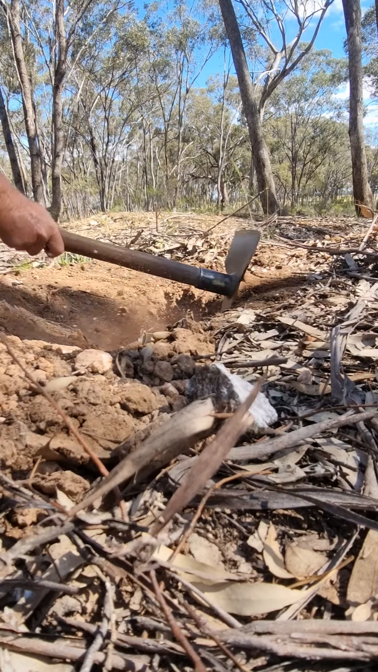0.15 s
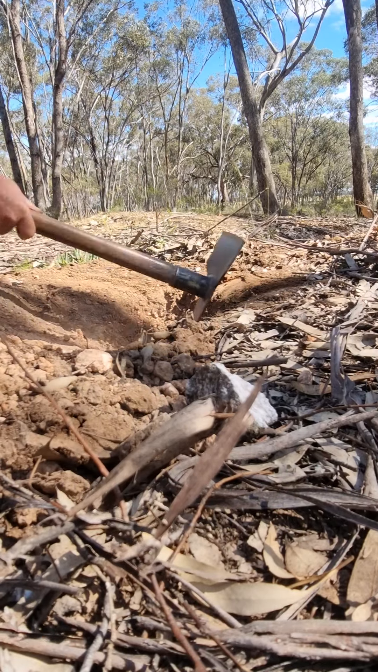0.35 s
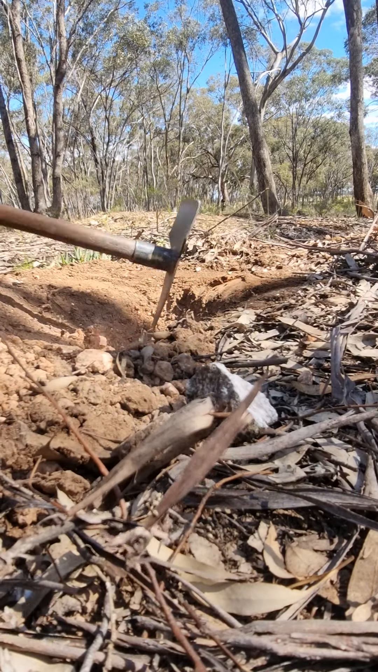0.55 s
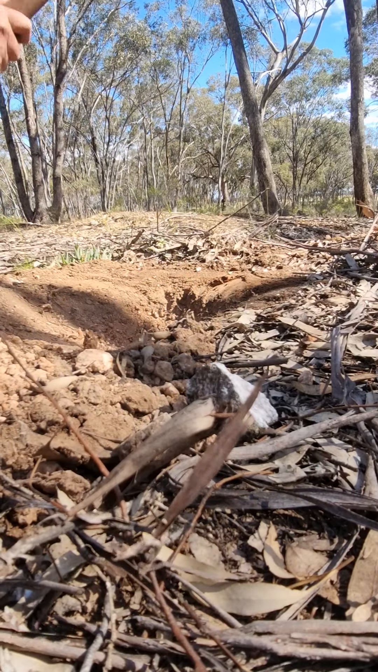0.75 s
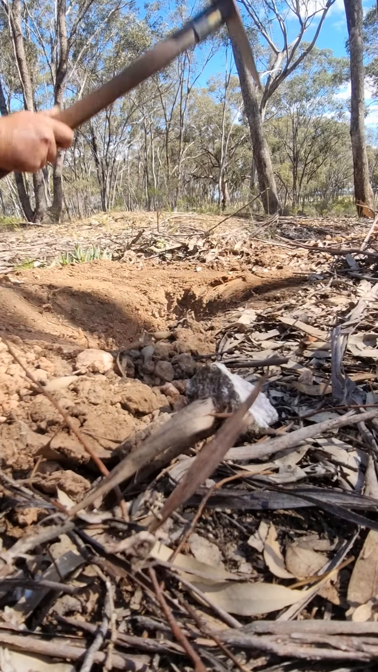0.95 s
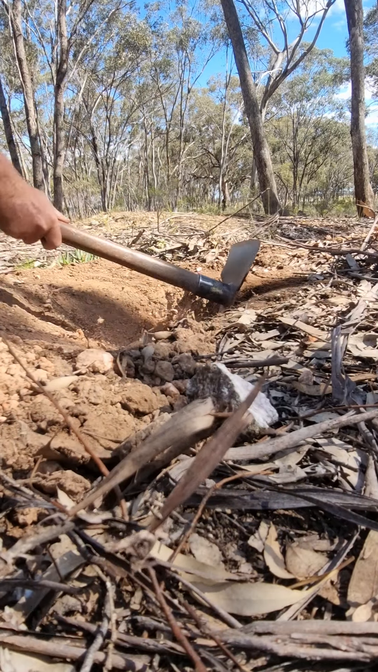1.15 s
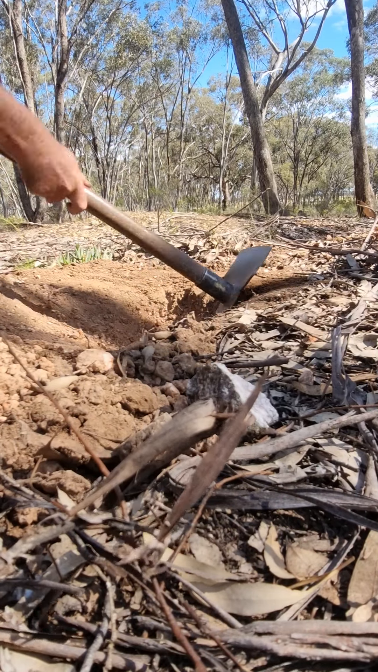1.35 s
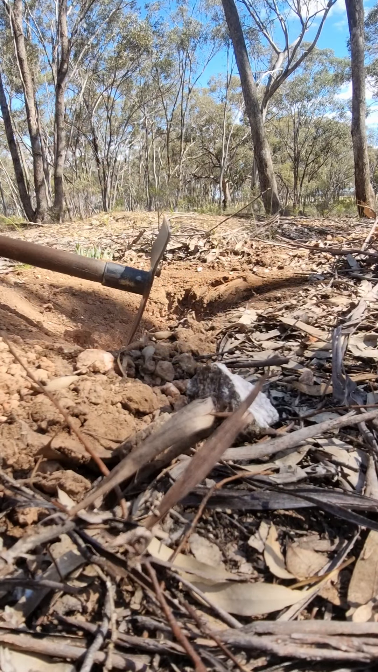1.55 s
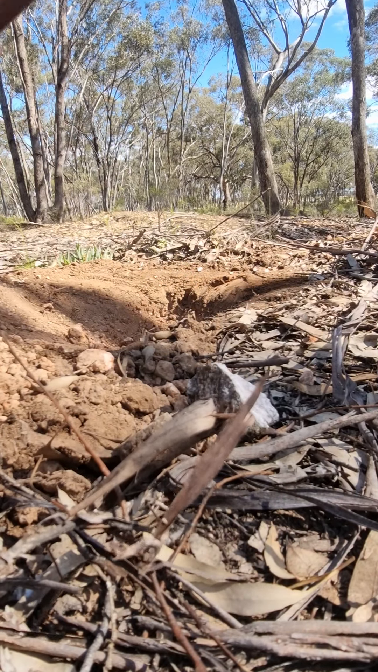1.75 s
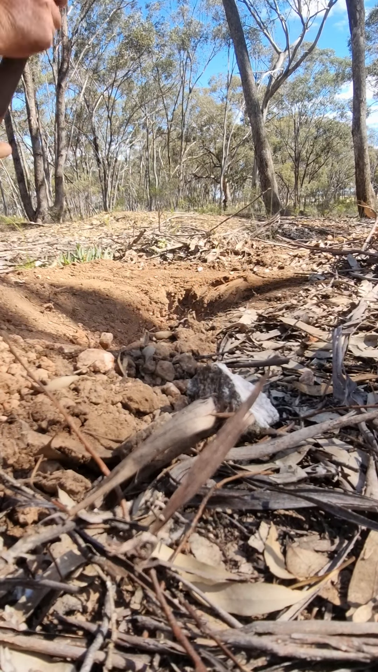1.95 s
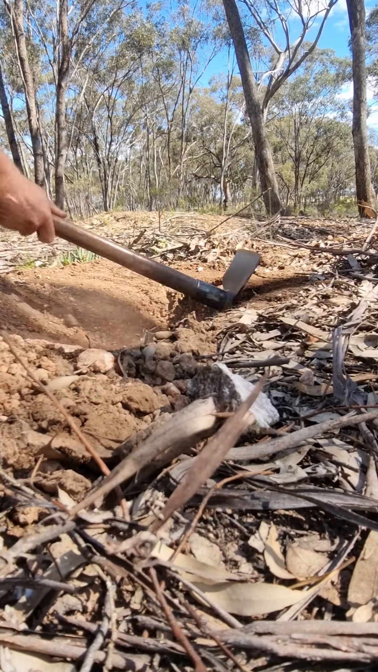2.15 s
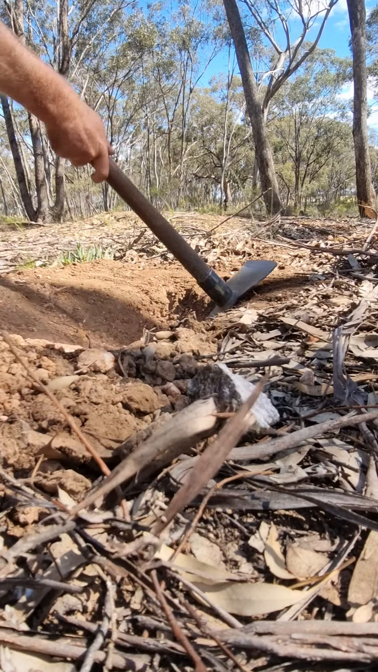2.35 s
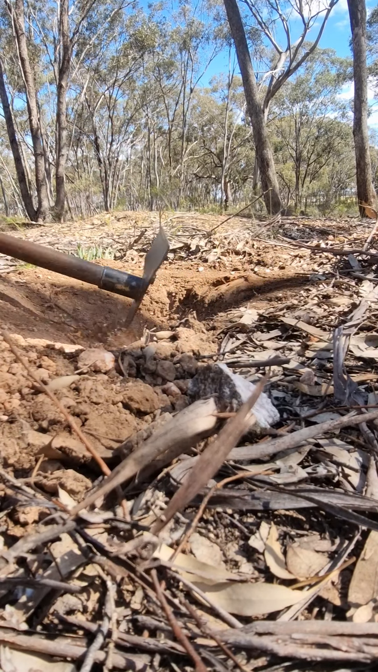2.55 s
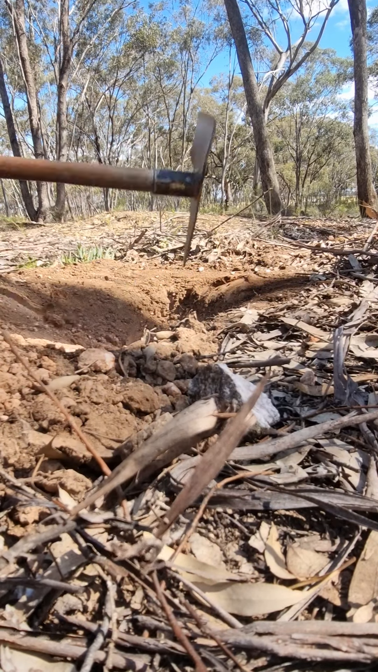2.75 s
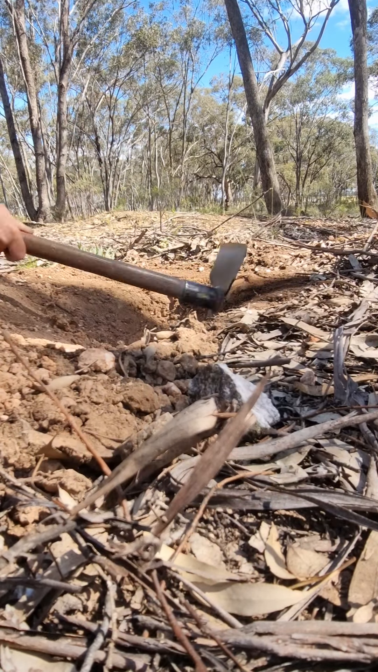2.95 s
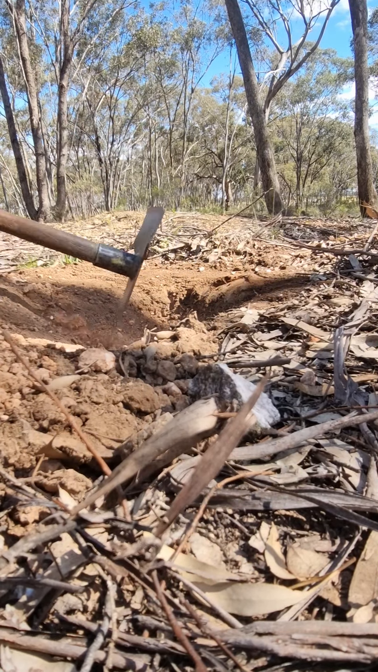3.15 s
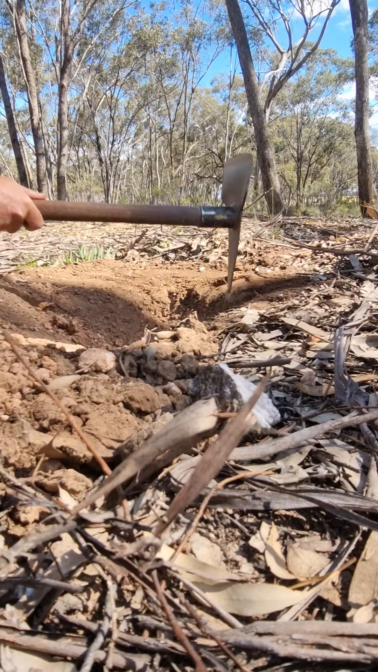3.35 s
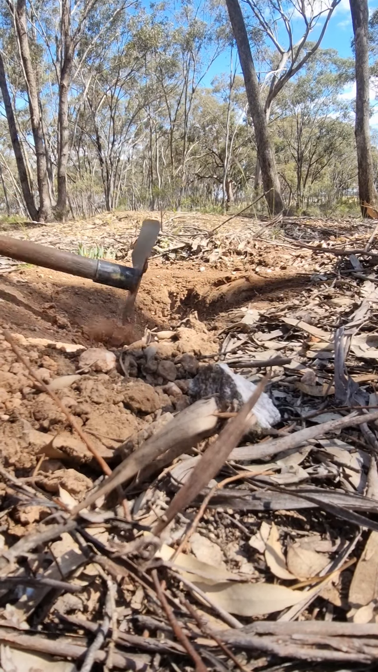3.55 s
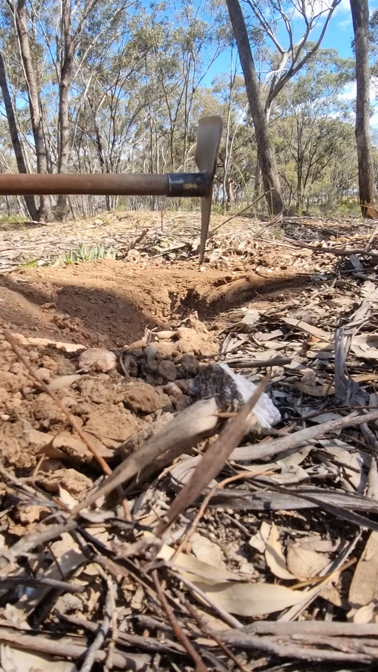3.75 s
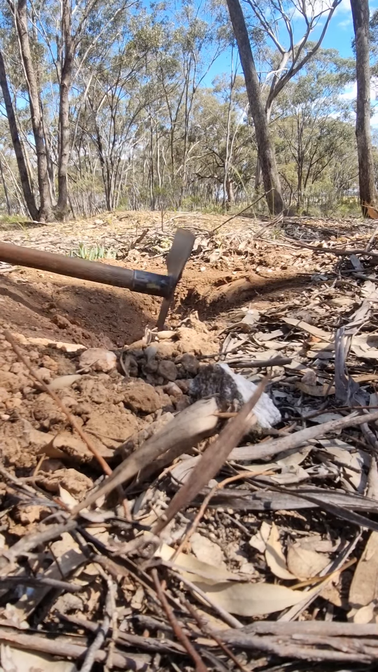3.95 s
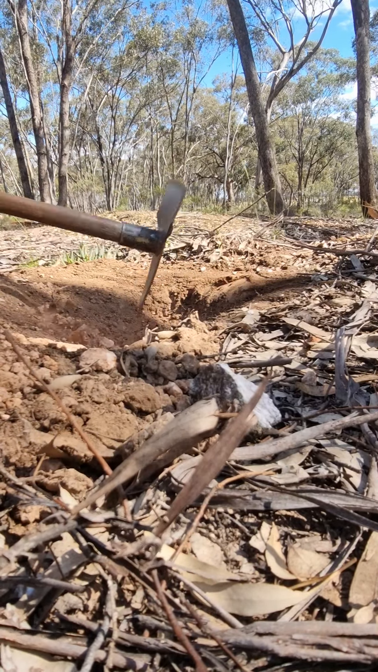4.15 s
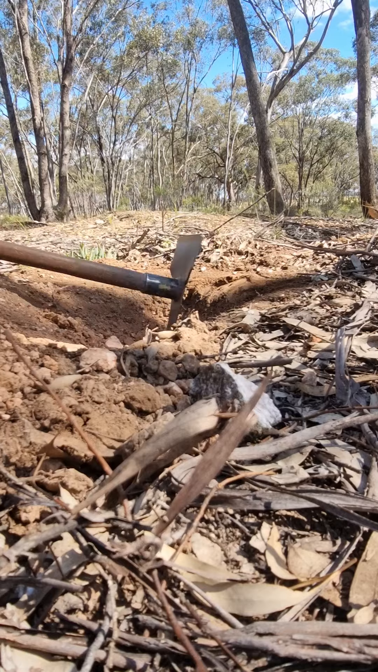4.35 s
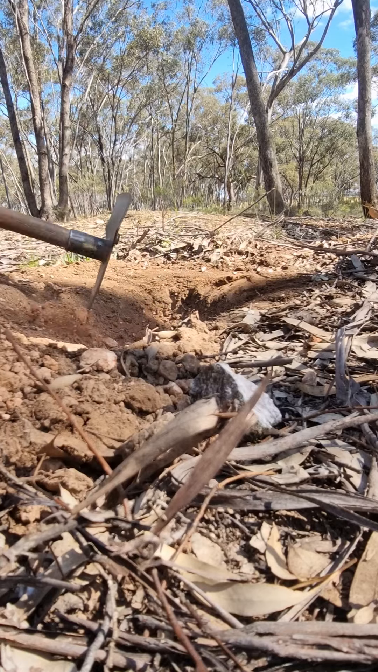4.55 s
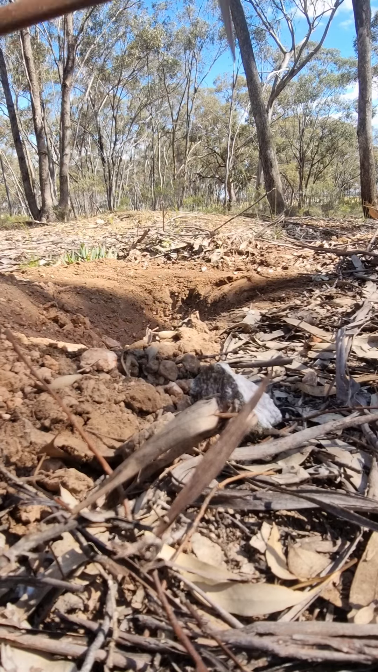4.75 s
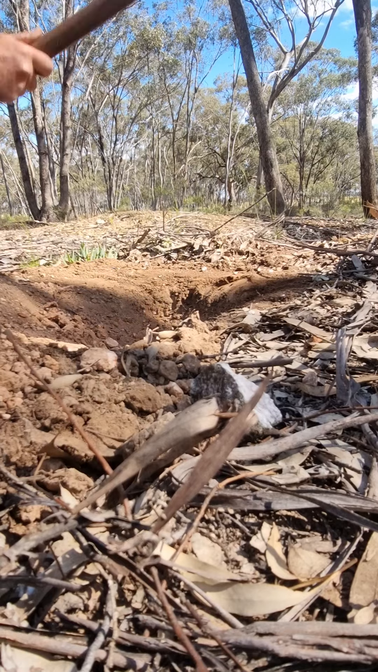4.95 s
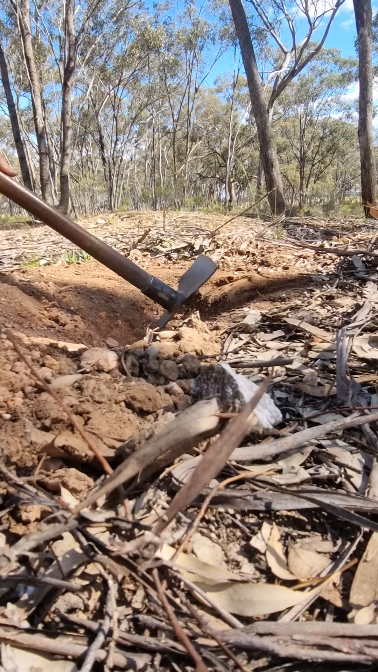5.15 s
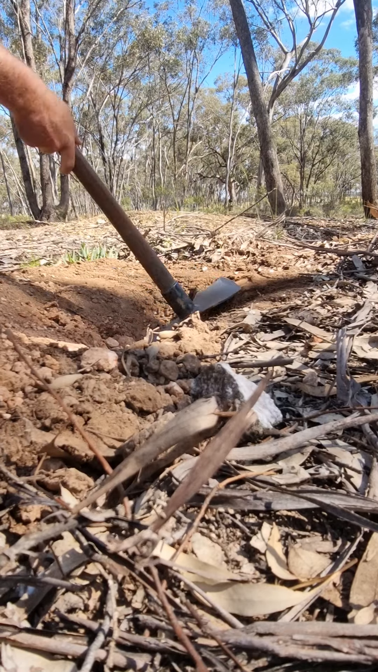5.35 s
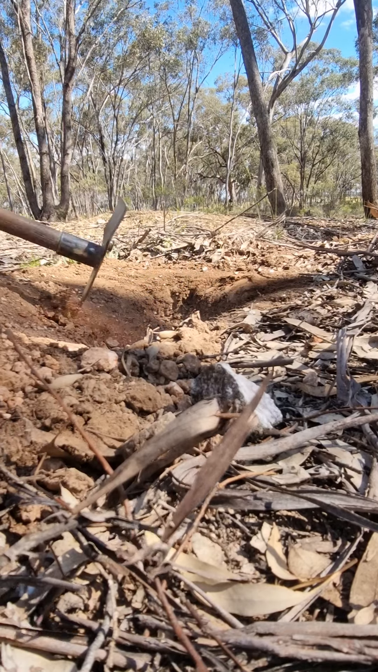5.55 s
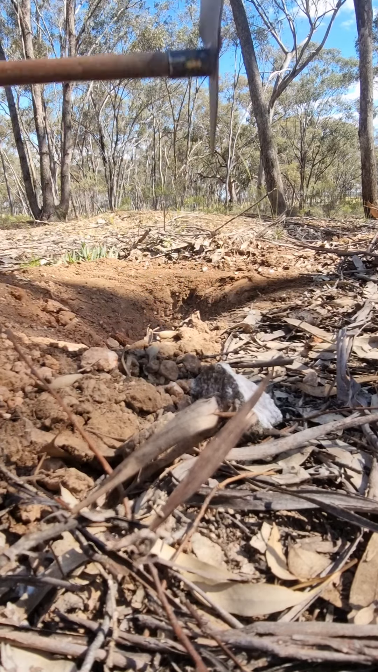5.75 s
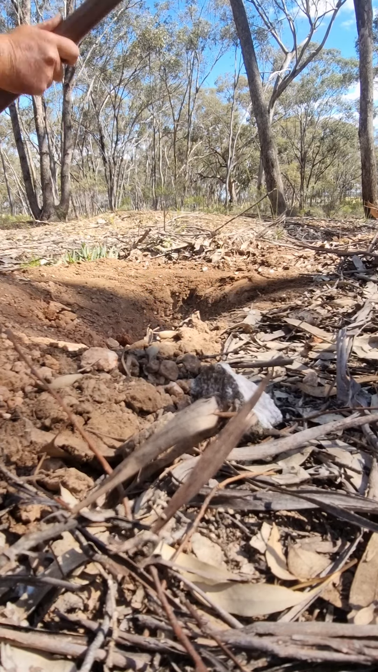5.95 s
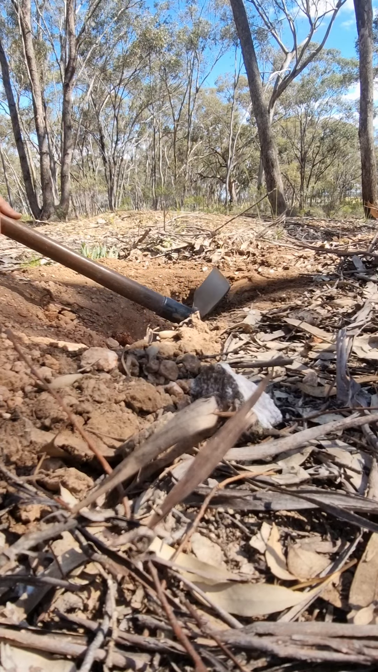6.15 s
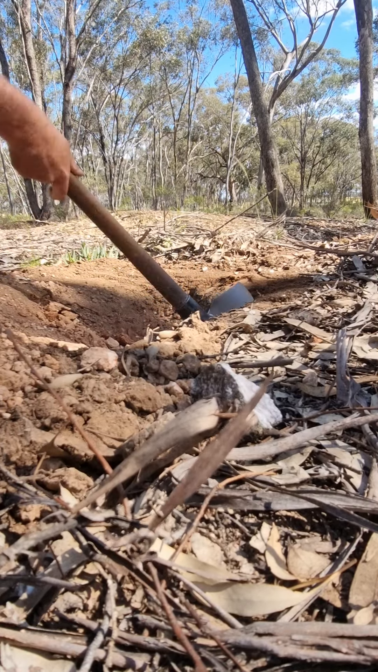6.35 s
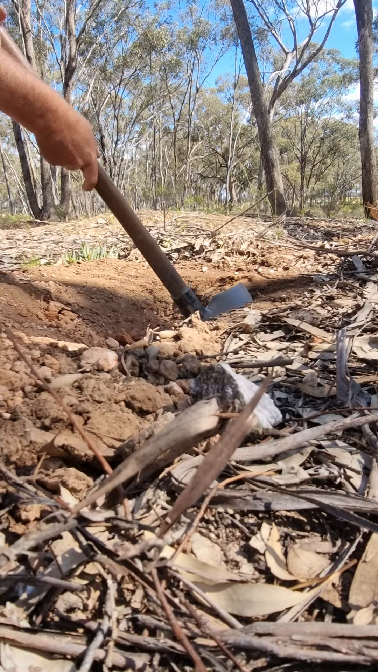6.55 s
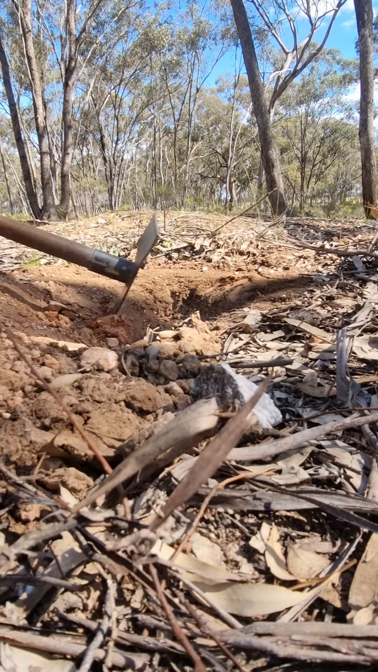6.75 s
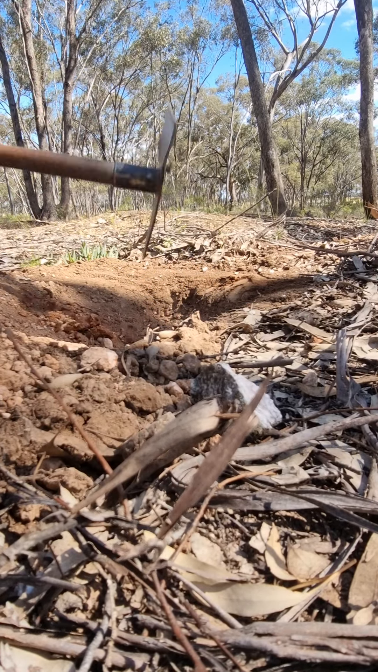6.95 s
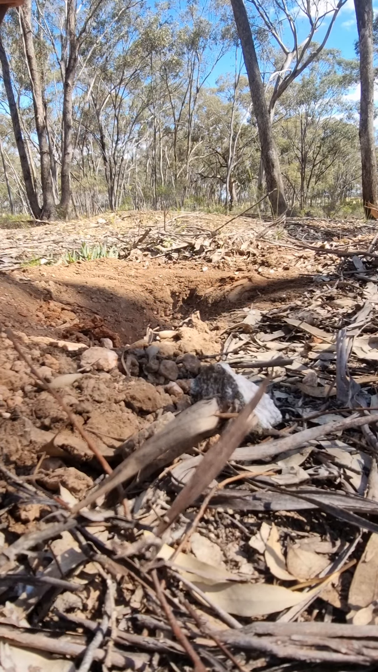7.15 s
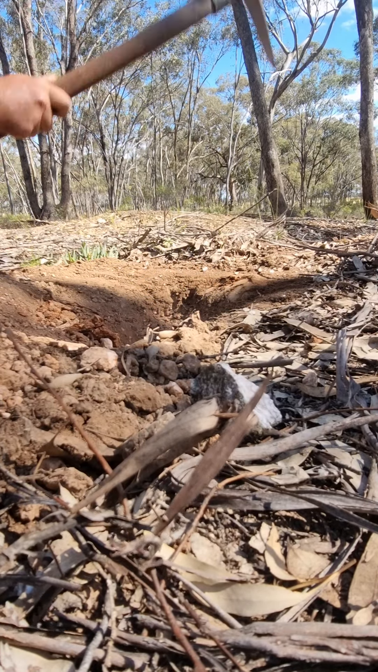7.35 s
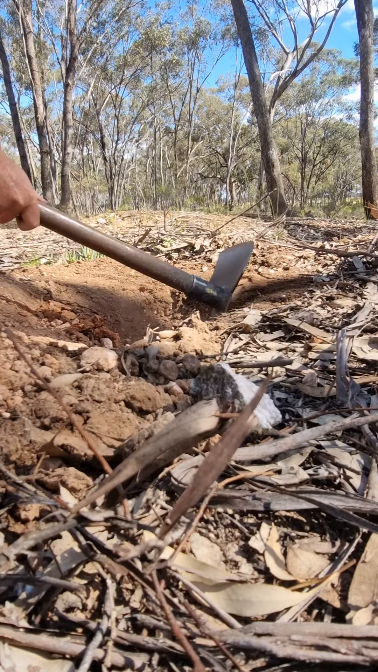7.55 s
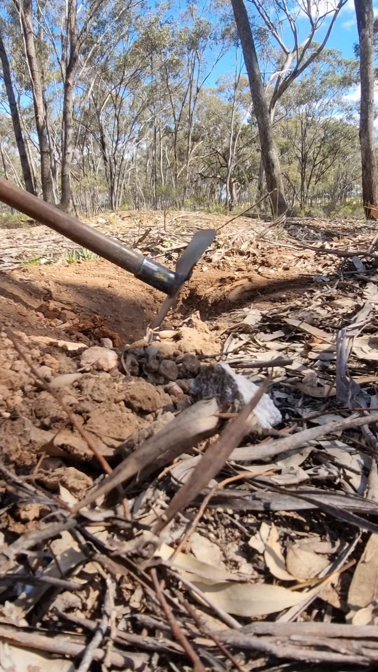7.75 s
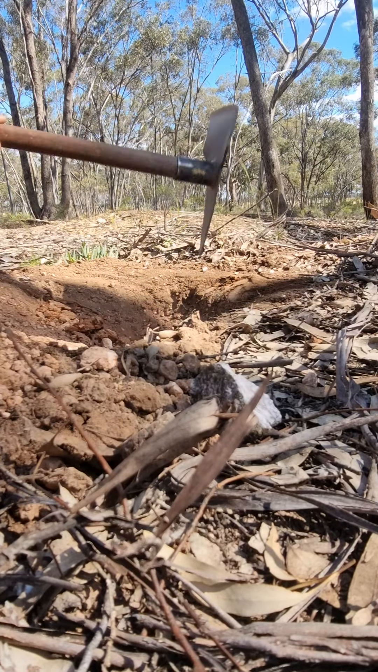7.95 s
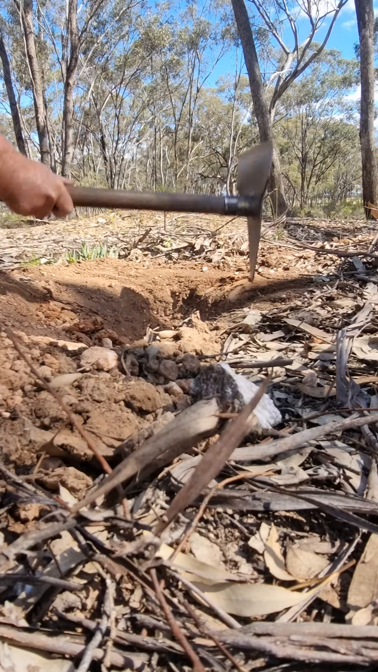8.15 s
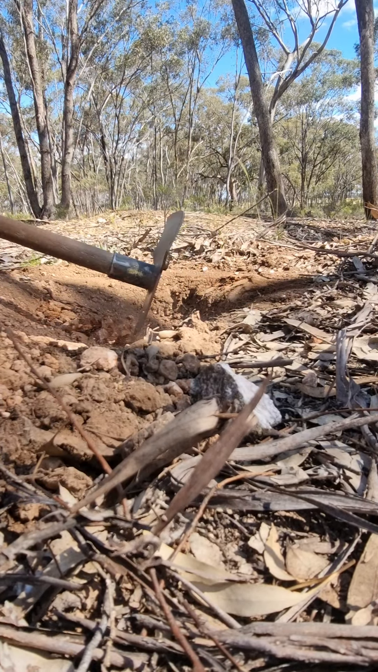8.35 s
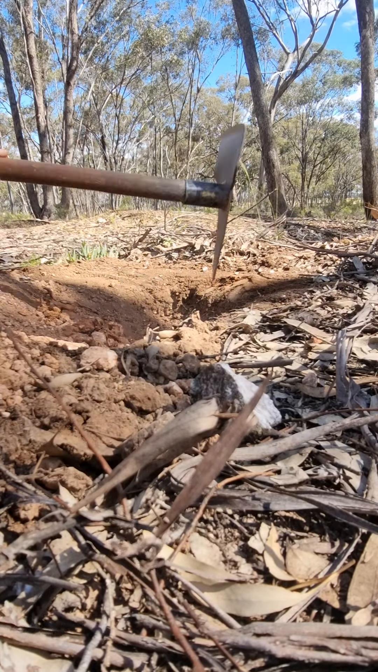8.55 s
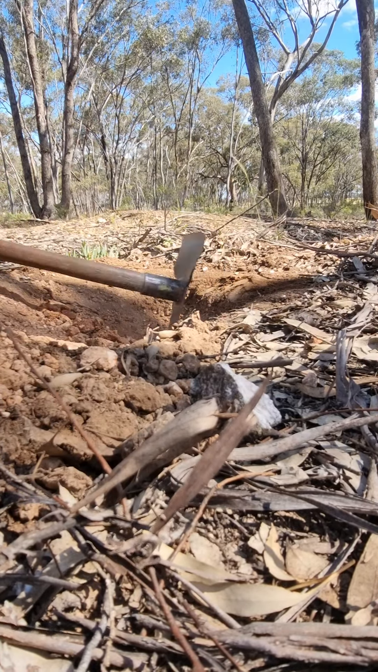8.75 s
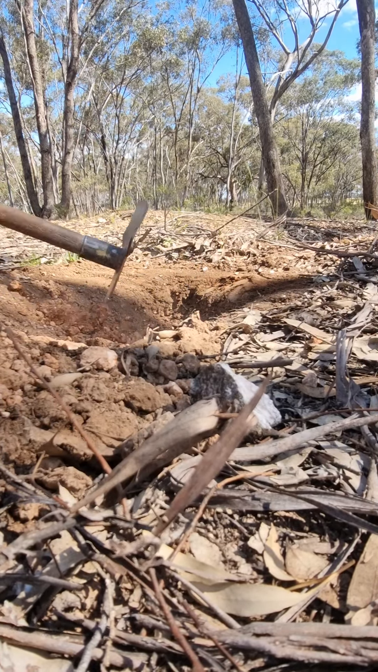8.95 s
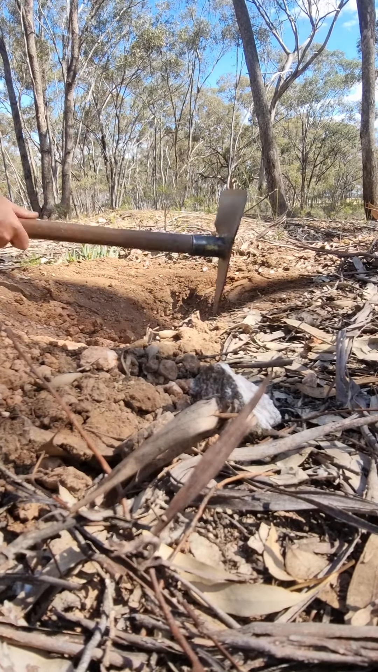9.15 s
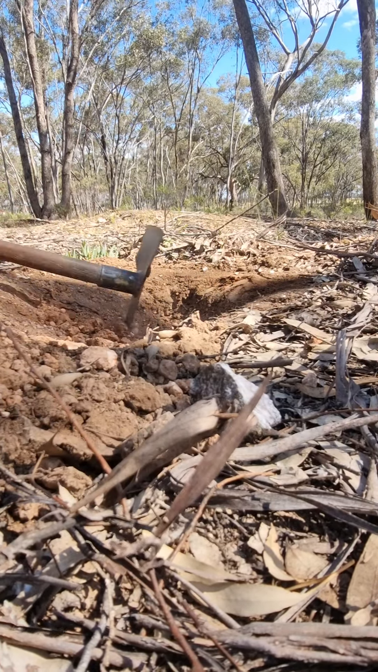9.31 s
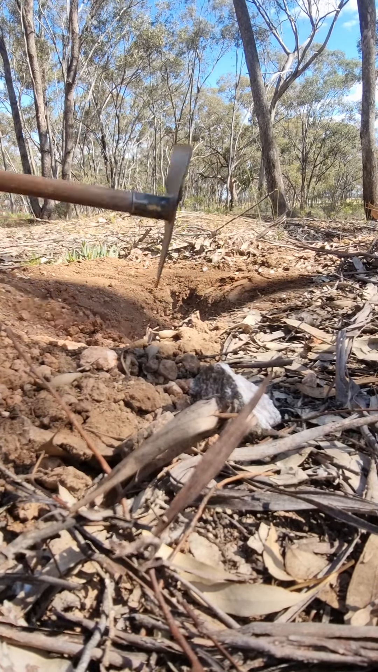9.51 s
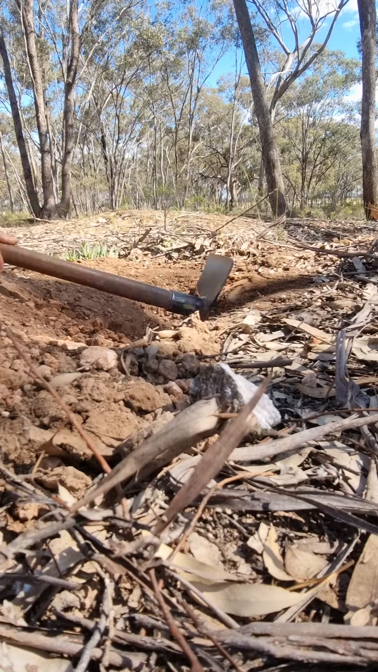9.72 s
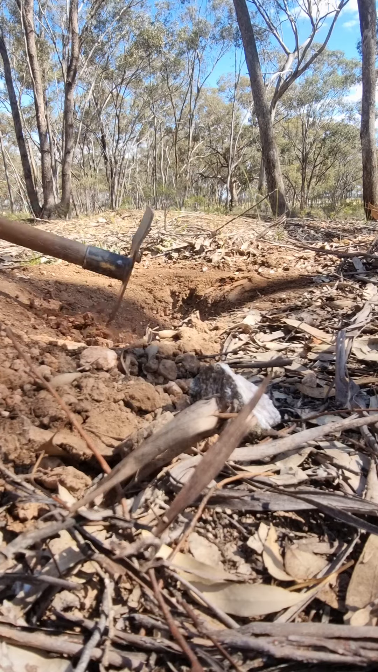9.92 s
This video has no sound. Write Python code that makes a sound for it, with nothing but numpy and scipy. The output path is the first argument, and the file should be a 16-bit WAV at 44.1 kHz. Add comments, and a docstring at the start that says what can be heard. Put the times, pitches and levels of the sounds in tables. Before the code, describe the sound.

A small pick chops and scrapes repeatedly into dry, stony ground, with grit pattering on leaves and a low wind rumble.

```python
"""A small pick chops again and again into dry, stony ground, close by in open bush. Each blow crunches through
grit, clanks on stone, thuds the earth, rings the steel head and throws up a spray of soil. Between blows the
point drags back, catching on stones that twang the wooden handle. Clods and grit patter on dry leaves and loose
soil slides into the hole. Behind it all a breeze rumbles on the microphone and rustles the trees."""
import sys
import numpy as np
from scipy import signal
from scipy.fft import rfft, irfft, next_fast_len
from scipy.io import wavfile

SR = 44100
rng = np.random.default_rng(int(sys.argv[2]) if len(sys.argv) > 2 else 0)


def waveform_to_disk(signal):
    """Save audio, clipped to [-1, 1], as 16-bit WAV at the path in sys.argv[1]."""
    frames = np.transpose(np.atleast_2d(signal))
    scaled = np.clip(frames, -1, 1) * 32767
    samples = np.round(scaled).astype(np.int16)
    wavfile.write(sys.argv[1], SR, samples)


N = 440118
TIME = np.arange(N) / SR
CATCH_S = 0.0078  # how long a stone holds the point
SPRAY_DB = -31  # thrown soil, relative to the bite of the blow

# The blows of the pick. Each row: start in seconds, crunch in dB, sinking time in seconds, treble
# over bass in dB, earth thud in dB, low and high steel ring in dB, clank in Hz, handle jolt in dB.
BLOWS = [(.151, -10, 0.0218, 4, -19, -36, -30.5, 6740, -44),
         (1.117, -12.5, 0.0145, 1, -7.5, -41, -36.5, 3050, -54),
         (2.175, -6.5, 0.0161, 0.5, -19, -36, -45, 1587, -52),
         (3.052, -14.5, 0.018, 4.5, -15.5, -31.5, -40, 4010, -42),
         (3.516, -16, 0.0125, 1, -15, -34.5, -44, 6970, -21),
         (3.975, -21.5, 0.017, 1.5, -23.5, -49, -45, 6640, -23),
         (4.413, -30, 0.021, 16.5, -23.5, -51, -61, 6680, -28),
         (5.14, -15, 0.0152, -4, -11.5, -43, -60, 1600, -14.5),
         (6.175, -19.5, 0.0192, 0, -17, -35.5, -54, 4150, -27.5),
         (7.517, -13, 0.017, 4.5, -9.5, -26.5, -37.5, 7080, -20.5),
         (8.273, -20.5, 0.038, 22, -16, -30, -40, 3380, -24.5),
         (8.802, -21.5, 0.0204, 2.5, -17.5, -47, -44, 7230, -23.5),
         (9.816, -6, 0.0091, -5.5, -26, -58, -38, 637, -22)]
# The point dragged through grit. Each row: start in seconds, length in seconds, level in dB.
DRAGS = [(0.362, 0.18, -37), (1.327, 0.047, -36.5), (1.471, 0.13, -35.5), (2.47, 0.32, -35),
         (3.083, 0.13, -35), (3.499, .19, -35.5), (3.956, 0.23, -33.5), (4.429, .16, -32.5),
         (5.498, .17, -36.5), (6.403, 0.14, -43.5), (6.6, 0.28, -35), (7.74, .06, -42), (7.847, 0.055, -34),
         (8.3, .17, -38), (8.788, 0.21, -32.5), (9.264, 0.18, -28), (9.845, .17, -32)]
# Clods landing. Each row: start in seconds, level in dB, pitch in Hz, left over right in dB.
CLODS = [(2.338, -27.5, 3340, 8), (2.693, -24, 2050, -3), (2.725, -24.5, 2200, -24),
         (2.748, -13.5, 1010, -12.5), (2.757, -23.5, 1690, 34), (2.839, -35.5, 3600, -16),
         (2.902, -37.5, 3400, -15), (4.224, -40.5, 780, 0), (9.107, -24.5, 2240, -15),
         (9.799, -25.5, 3770, -25.5)]
# Resonances heard while the point is buried: the pick's modes, plus the microphone's 15 kHz peak.
# Each row: frequency in Hz, width in Hz, lift when struck in dB, lift when dragged in dB.
RESONANCES = [(371, 37, 5.5, 13), (549, 24, 4, 5.5), (702, 96, 1.5, 7), (1104, 220, 4, 16.5),
              (1585, 52, 4, 17), (1627, 47, 10.5, 20.5), (1908, 96, 6, 15), (2510, 170, 7.5, 17.5),
              (2870, 110, 2.5, 2), (3156, 120, 6, 12), (3870, 88, -4.5, 13), (4130, 260, 9, 18.5),
              (5166, 146, 12, 10), (5635, 39, 2, 12.5), (6260, 50, 4, -3), (6330, 82, 16.5, -10),
              (7090, 990, 9, 15), (7500, 240, -14, 5), (9800, 30, 16.5, 5), (10230, 190, 13, 18),
              (10950, 240, 6, 20), (13070, 1000, 5, 16.5), (15060, 570, 18.5, 13)]
# Modes of the head ringing free. Each row: frequency in Hz, t60 in seconds, scraped level in dB.
STEEL_MODES = [(4168, 0.37, -25.5), (5583, 0.29, -45), (625.6, 0.15, -23.5), (1101, 0.058, -17.5),
               (1700, 0.11, -13), (2610, 0.099, -23.5), (4064, 0.069, -16), (5900, 0.048, -24),
               (9490, 0.12, -39)]


def crunch(split_hz=1800, crush_share=0.39, bass_stretch=1.57):
    """The point shatters grit; the crack is bright at first and dulls as the steel sinks in."""
    # Shattering grit. Each row: frequency in Hz, level in dB.
    crunch_spectrum = [(40, -25), (150, -0.5), (400, -5), (850, -7.5), (2200, -13.5), (3900, -15),
                       (4700, -20), (7400, -22.5), (8400, -33.5), (9600, -25.5), (13500, -26.5),
                       (16000, -43)]
    bass, treble = np.zeros((2, N))
    lead_in = np.linspace(0, 1, SR // 200) ** 2  # a faint 5 ms swell of grit noise into each crunch
    for start, db, sink_s, bright_db, *_ in BLOWS:
        crush_s = crush_share * sink_s
        add(treble, start - len(lead_in) / SR, amp(db - 14.5) * lead_in)
        add(treble, start, amp(db - 2 + bright_db / 2) * burst(crush_s, rise=0.0008))
        add(bass, start, amp(db - bright_db / 2) * burst(crush_s * bass_stretch, rise=0.0014))
    cracks = grains(per_s=9000, spread_db=4)
    dull = signal.sosfilt(signal.butter(2, split_hz, fs=SR, output="sos"), cracks * bass)
    sharp = signal.sosfilt(signal.butter(2, split_hz, "high", fs=SR, output="sos"), cracks * treble)
    peaks = [(hz, width, db) for hz, width, db, _ in RESONANCES]
    return body(sharp - dull, crunch_spectrum, peaks)


def bites():
    """Start and level of each blow's bright edge, which drives the clank and the flying soil."""
    return [(start, db + bright_db / 2) for start, db, _, bright_db, *_ in BLOWS]


def clanks(detune=0.017):
    """The struck stone gives each blow its own short clank, and the shock runs up the handle."""
    out = np.zeros(N)
    for (start, bite_db), (*_, stone_hz, jolt_db) in zip(bites(), BLOWS):
        pitches = stone_hz * (1 + detune * rng.normal(size=3))  # rubbing contact splits the note
        cluster = sum(ring(hz, t60=0.023, rise=0.00061) for hz in pitches) / 3
        add(out, start, amp(bite_db + 1.5) * cluster)
        add(out, start + 0.00254, amp(jolt_db + 7.5) * handle_knock(t60=0.053))
    return out


def handle_knock(t60, low_hz=380.4, high_hz=530):
    """The wooden handle bends in two modes; the grip shifts them a little each time."""
    tune = 1 + 0.025 * rng.uniform(-0.95, 1)
    upper = amp(-5) * ring(high_hz * tune, t60=0.048, rise=0.0027)
    return ring(low_hz * tune, t60, rise=0.003) + upper


def earth_thuds(earth_hz=122, width_s=0.0039, late_s=0.0018):
    """The earth heaves for a cycle or two as it stops the head."""
    out = np.zeros(N)
    t = TIME[:SR // 16] - 1 / 32
    heave = -np.cos(2 * np.pi * earth_hz * t) * np.exp(-((t - late_s) / width_s) ** 2)
    for start, _, sink_s, _, thud_db, *_ in BLOWS:
        add(out, start + sink_s + t[0] - 0.001, amp(thud_db) * heave)
    return out


def steel_ring():
    """The free blade sings on after each blow in its two longest modes."""
    out = np.zeros(N)
    for start, *_, low_db, high_db, _, _ in BLOWS:
        for (hz, t60, _), db in zip(STEEL_MODES, (low_db, high_db)):
            add(out, start, amp(db) * ring(hz, t60, rise=0.00044))
    return out


def stone_catches(snags_per_s=14, spread_db=2.5, buried_s=0.2):
    """Lists where stones catch the dragged point: set hard catches, then lesser random snags."""
    # Hard catches, and one short chop of the point at 9.29 s. Each row: start in seconds, level in dB, handle
    # ring in dB.
    hard_catches = [(.432, -23.5, -41), (.505, -25, -38), (1.507, -20, -44), (2.567, -25.5, -38),
                    (2.617, -13, -49), (3.126, -19, -10.5), (3.5, -24.5, -45), (3.556, -18, -18.5),
                    (3.583, -16, -41), (4.056, -23, -24.5), (4.481, -24.5, -19), (4.498, -17, -21),
                    (4.59, -23, -38), (5.573, -23, -29), (6.482, -24, -53), (6.689, -22.5, -55),
                    (6.76, -29, -52), (6.807, -9.5, -27), (7.762, -28, -55), (7.785, -28.5, -38),
                    (8.289, -9, -20), (8.366, -21.5, -48), (8.423, -28.5, -25.5), (8.892, -26.5, -25),
                    (8.956, -26, -27), (9.292, -14.5, -41), (9.335, -14, -41), (9.397, -12, -34),
                    (9.431, -16, -34)]
    snags = []
    for start, length, drag_db in DRAGS:
        count = max(round(snags_per_s * length), 1)
        for k, (place, size) in enumerate(rng.random((12, 2))[:count]):
            when = start + length * (k + place) / (count + 0.5)
            db = drag_db + 1.5 + spread_db * (2 * size - 1)
            # a point still buried from a blow twangs the handle more
            buried = any(0 < when - blow[0] < buried_s for blow in BLOWS)
            snags.append((when, db, db + (-2 if buried else -16)))
    return hard_catches + snags


def scrapes(catches, judder_db=4, sing_db=-7, detune=0.0084, vary_db=4):
    """Grit grinds under the dragged point in uneven slips; stones catch it and twang the handle."""
    # Grinding grit. Each row: frequency in Hz, level in dB.
    grit_spectrum = [(40, -8.5), (150, -4), (450, -3), (900, -11), (2200, -10), (3900, -15.5),
                     (4800, -17.5), (7400, -18.5), (8500, -40), (9800, -29.5), (13500, -33), (16000, -29)]
    drag, catch, handle = np.zeros((3, N))
    for start, length, db in DRAGS:
        add(drag, start, amp(db - 6.5) * signal.windows.tukey(int(length * SR), 0.4))
    for start, db, handle_db in catches:
        add(catch, start, amp(db - 1) * burst(CATCH_S, rise=0.0022))
        t60 = np.interp(handle_db, (-28, -15), (0.11, 0.17))  # harder knocks ring longer
        add(handle, start, amp(handle_db - 3) * handle_knock(t60))
    judder = unit(amp(judder_db * wander(rate_hz=91)))
    force = drag * judder * grains(per_s=3500, spread_db=1.5)
    force += catch * grains(per_s=9000, spread_db=-1)
    # between slips the head rings free
    blade = sum(amp(db + sing_db) * unit(ring(hz, t60, rise=0.00071)) for hz, t60, db in STEEL_MODES)
    sing = signal.oaconvolve(force, blade / np.sqrt(len(blade)))[:N]
    # the point shifts among three contacts, each favouring and detuning other resonances
    contacts = np.array([amp(10 * wander(rate_hz=6)) for _ in range(3)])
    grind = np.zeros(N)
    for share in contacts / contacts.sum(0):
        peaks = [(hz * (1 + detune * rng.uniform(-1.07, 1)), width, db + vary_db * rng.normal())
                 for hz, width, _, db in RESONANCES]
        grind += body(force * share, grit_spectrum, peaks)
    return grind + handle + sing


def stone_clacks(catches, light_hz=3400, heavy_hz=850):
    """Each caught stone clacks and sets the steel clinking; harder catches are bigger, lower stones."""
    out = np.zeros(N)
    for start, db, _ in catches:
        weight = np.interp(db, (-36, -21), (0, 1))
        stone_hz = light_hz * (heavy_hz / light_hz) ** weight * np.exp(0.247 * rng.normal())
        # the stone rocks against the steel as the point slips past
        for delay, size, detune in rng.random((3, 3)):
            clack = ring(stone_hz * (0.876 + 0.22 * detune), t60=0.033, rise=0.00061)
            add(out, start + delay * CATCH_S, amp(db - 4) * size * clack)
        clink_db = min(db, -26) + 4  # capped: a hard catch also damps the head
        for hz, t60, mode_db in STEEL_MODES:
            place_db = 5 * rng.uniform(-1.4, 1)  # the place of contact decides which modes speak
            clink = amp(clink_db + mode_db + place_db) * ring(hz, t60, rise=0.00071)
            add(out, start + CATCH_S / 2, clink)
    return out


def soil_spray(settle_s=0.079, trickle_s=0.017, crumble_s=0.016):
    """Fine soil sifts down after a blow, behind a drag, and where a clod bursts."""
    # Sifting soil. Each row: frequency in Hz, level in dB.
    spray_spectrum = [(60, -25.5), (400, 8), (1500, -2.5), (3000, -2.5), (6500, -10), (8500, -20),
                      (11000, -17.5), (16000, -19)]
    flow, t = np.zeros(N), TIME[:SR]
    for start, db in bites():
        add(flow, start, amp(db + SPRAY_DB) * (1 - np.exp(-t / 0.013)) * np.exp(-t / settle_s))
    for start, length, db in DRAGS:
        trickle = (1 - np.exp(-2 * t / length)) * np.exp(-t / (trickle_s + length / 2))
        add(flow, start + length / 2, amp(db - 15) * trickle)
    for start, db, *_ in CLODS:
        add(flow, start, amp(db - 19) * np.exp(-t / crumble_s))
    return np.array([body(flow * grains(per_s=1800, spread_db=-2.5), spray_spectrum) for _ in range(2)])


def soil_slides():
    """Loosened soil slides back into the hole with a soft swish."""
    # The slides. Each row: start in seconds, length in seconds, level in dB.
    slides = [(6.184, 0.38, -56.5), (8.429, .11, -44.5), (9.418, .18, -44.5)]
    # Sliding soil. Each row: frequency in Hz, level in dB.
    soil_spectrum = [(150, -12), (520, 9), (1000, -16), (1900, -13), (2800, 2), (4200, -18), (7500, -24),
                     (10000, -32)]
    flow = np.zeros(N)
    for start, length, db in slides:
        add(flow, start, amp(db) * signal.windows.tukey(int(length * SR), 0.7))
    return np.array([body(flow * grains(per_s=6000, spread_db=4.5), soil_spectrum) for _ in range(2)])


def grit_ticks(flight_s=0.1, spill_s=0.034):
    """Coarse grit, thrown by a blow or spilt by a clod, lands on dry leaves in separate ticks."""
    # A tapped dry leaf. Each row: frequency in Hz, level in dB.
    leaf_spectrum = [(100, -34), (1000, -8), (3500, 2), (7000, 8), (8500, -6), (16000, -5)]
    flow, t = np.zeros(N), TIME[:SR]
    shower = t / flight_s * np.exp(1 - t / flight_s)
    for start, db in bites():
        add(flow, start, amp(db + SPRAY_DB - 22) * shower)
    for start, db, *_ in CLODS:
        add(flow, start, amp(db - 27) * np.exp(-t / spill_s))
    flex = rng.standard_normal(SR // 100) * np.exp(-t[:SR // 100] / 0.002)
    flex /= np.linalg.norm(flex)
    hits = [body(flow * grains(per_s=160, spread_db=10), leaf_spectrum) for _ in range(2)]
    left, right = (signal.oaconvolve(side, flex)[:N] for side in hits)
    return np.array([left + 0.5 * right, right + 0.5 * left])


def clod_taps(fade_s=0.001, width_octaves=1.13, snap_db=-19):
    """Each clod lands on the leaves with a dry tap at its own pitch."""
    out, t = np.zeros((2, N)), TIME[:SR // 40]
    hz = np.fft.rfftfreq(len(t), 1 / SR)
    for start, db, tap_hz, side_db in CLODS:
        colour = np.exp(-(np.log2((hz + 1) / tap_hz) / width_octaves) ** 2) + amp(snap_db)
        noise = unit(irfft(rfft(rng.standard_normal(len(t))) * colour, len(t)))
        pan_db = np.array([[side_db], [-side_db]]) / 2
        add(out, start, amp(db + pan_db) * noise * np.exp(-t / fade_s))
    return out


def microphone_ports(x):
    """Sound from the hole reaches the left port first, and with more treble."""
    # Phase between the ports. Each row: frequency in Hz, lead of the left in radians.
    phase_lead = [(0, 0), (400, 0.83), (1120, 2), (2000, 2.5), (3000, 4), (4130, 4.5), (4900, 3.5),
                  (5600, 4.5), (7600, 8), (10000, 7.5), (12000, 13), (16000, 20.5)]
    # Balance between the ports. Each row: frequency in Hz, left over right in dB.
    side_balance = [(60, -2), (200, -5.5), (380, -2.5), (700, -0.5), (1300, -1), (2400, 4), (4400, 2),
                    (9000, 5.5), (11000, 6.5), (15000, 13)]
    size = next_fast_len(N + SR, real=True)
    hz = np.fft.rfftfreq(size, 1 / SR)
    lead = np.interp(hz, *np.transpose(phase_lead))
    left = amp(level_at(side_balance, hz) / 2) * np.exp(0.5j * lead)
    return irfft(rfft(x, size) * np.array([left, 1 / left]), size)[:, :N]


def bush_reflections(x, level_db=-14, t60=0.044):
    """Leaf litter and trunks throw back a faint, short reflection."""
    t = TIME[:SR // 3]
    taps = rng.standard_normal((2, len(t))) * (rng.random((2, len(t))) < 0.05)
    taps *= (t > 0.002) * np.exp(-np.log(1000) * t / t60)
    return amp(level_db) * signal.oaconvolve(x[None], taps / np.linalg.norm(taps[0]), axes=1)[:, :N]


def breeze(lumps_db=3, flutter_db=1.54, shared=0.39):
    """Gusts buffet the microphone, partly alike on both sides, over the soft hiss of leaves."""
    # Wind rumble and leaf hiss. Each row: frequency in Hz, level in dB.
    wind_spectrum = [(15, -38), (35, -16), (65, 0), (95, -5), (150, -17), (250, -29), (600, -49),
                     (2000, -74.5)]
    hiss_spectrum = [(20, -2), (100, 1), (400, 0.5), (1000, -9.5), (1700, -15), (2100, -16.5),
                     (3000, -12.5), (5500, -18), (7200, -19.5), (8400, -31), (12000, -33), (16000, -30)]
    # Swell of the gusts and of the trees. Each row: time in seconds, level in dB.
    gust_levels = [(0.0, -45.5), (0.22, -42.5), (1.83, -48), (2.03, -44), (3.45, -56), (3.67, -47.5),
                   (4.89, -53.5), (5.23, -39), (5.78, -53), (6.09, -44), (7.09, -47.5), (7.23, -56.5),
                   (9.76, -61.5), (9.98, -60)]
    tree_levels = [(0, -53), (4, -54), (6.6, -50.5), (9.98, -50)]
    lumps = unit(amp(lumps_db * wander(rate_hz=15.7)))
    buffet = amp(np.interp(TIME, *np.transpose(gust_levels)) + 6) * lumps
    rustle = amp(np.interp(TIME, *np.transpose(tree_levels)) + flutter_db * wander(rate_hz=7.7))
    common = coloured(wind_spectrum)
    sides = []
    for _ in range(2):
        rumble = np.sqrt(shared) * common + np.sqrt(1 - shared) * coloured(wind_spectrum)
        sides.append(buffet * rumble + rustle * coloured(hiss_spectrum))
    return np.array(sides)


def amp(db):
    """Decibels to gain."""
    return 10 ** (np.asarray(db) / 20)


def unit(x):
    """Scales to rms 1."""
    return x / np.sqrt(np.mean(x ** 2) + 1e-20)


def level_at(spectrum, hz):
    """Joins spectrum points on a log-frequency axis."""
    point_hz, db = np.transpose(spectrum)
    return np.interp(np.log(hz + 1), np.log(point_hz + 1), db)


def add(mix, start, sound):
    """Mixes a sound in at a start time in seconds."""
    part = mix[..., max(round(start * SR), 0):][..., :sound.shape[-1]]
    part += sound[..., :part.shape[-1]]


def coloured(spectrum):
    """Steady noise with a given spectrum."""
    gain = amp(level_at(spectrum, np.fft.rfftfreq(N, 1 / SR)))
    return unit(irfft(rfft(rng.standard_normal(N)) * gain, N))


def wander(rate_hz):
    """Smooth random motion of rms 1."""
    rolloff = np.exp(-(np.fft.rfftfreq(N, 1 / SR) / rate_hz) ** 2)
    return unit(irfft(rfft(rng.standard_normal(N)) * rolloff, N))


def grains(per_s, spread_db):
    """Sparse clicks of random sign; a positive spread makes a few louder, a negative one softer."""
    size = amp(spread_db * np.minimum(rng.exponential(1, N), 3)) * rng.choice([-1, 1], N)
    return unit(size * (rng.random(N) < per_s / SR))


def body(x, spectrum, peaks=(), size=8192):
    """Minimum-phase filter of unit energy: a smooth spectrum with resonances standing on it."""
    hz = np.fft.rfftfreq(size, 1 / SR)
    lift = 1 + sum(amp(db) ** 2 / (1 + (2 * (hz - f) / width) ** 2) for f, width, db in peaks)
    log_gain = np.log(amp(level_at(spectrum, hz)) * np.sqrt(lift))
    mirrored = np.concatenate([log_gain, log_gain[-2:0:-1]])
    taps = np.fft.ifft(np.exp(np.conj(signal.hilbert(mirrored)))).real[:size // 2]
    return signal.oaconvolve(x, taps / np.linalg.norm(taps))[:N]


def burst(length, rise):
    """Envelope of a collapse: fast rise, brief hold, quick end."""
    t = TIME[:SR // 8]
    return (1 - np.exp(-t / rise)) * np.exp(-(t / length) ** 1.42)


def ring(hz, t60, rise):
    """One dying mode."""
    t = TIME[:SR // 2]
    return np.sin(2 * np.pi * hz * t) * (1 - np.exp(-t / rise)) * np.exp(-np.log(1000) * t / t60)


def scene():
    """The pick in its hole, the soil it throws, and the bush around."""
    catches = stone_catches()
    blows = crunch() + clanks() + earth_thuds() + steel_ring()
    pick = blows + scrapes(catches) + stone_clacks(catches)
    placed_pick = microphone_ports(pick) + bush_reflections(pick)
    debris = soil_spray() + soil_slides() + grit_ticks() + clod_taps()
    return placed_pick + debris + breeze()


def record(dry):
    """Clips any peak at full scale, then cuts the very top of the treble."""
    lowpass = signal.firwin(255, 16200, window=("kaiser", 8), fs=SR)
    return signal.oaconvolve(np.clip(dry, -1, 1), lowpass[None], "same")


dry = scene()
out = record(dry)
waveform_to_disk(out)
```